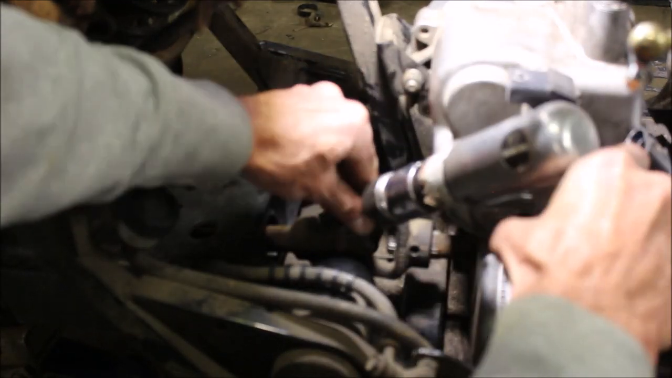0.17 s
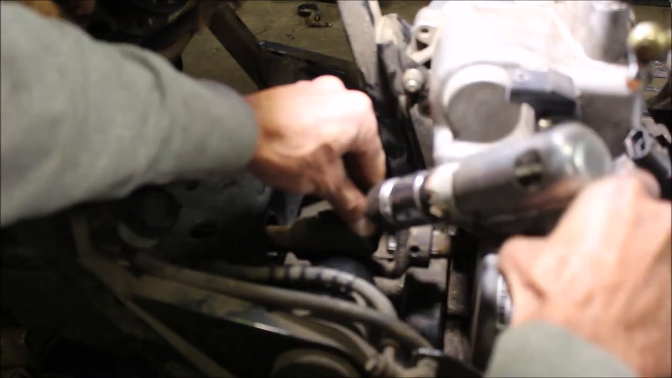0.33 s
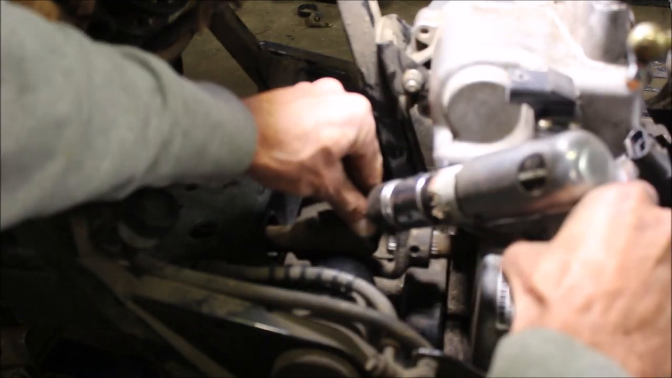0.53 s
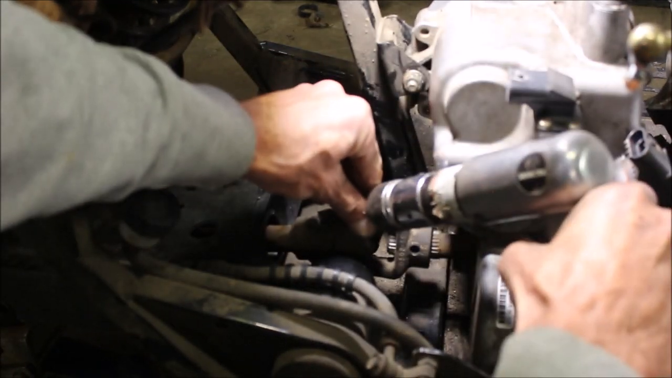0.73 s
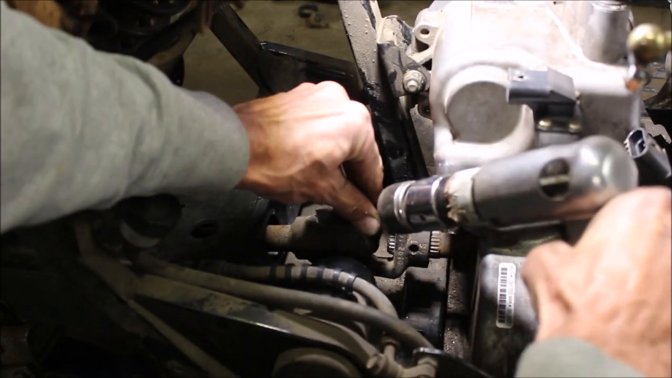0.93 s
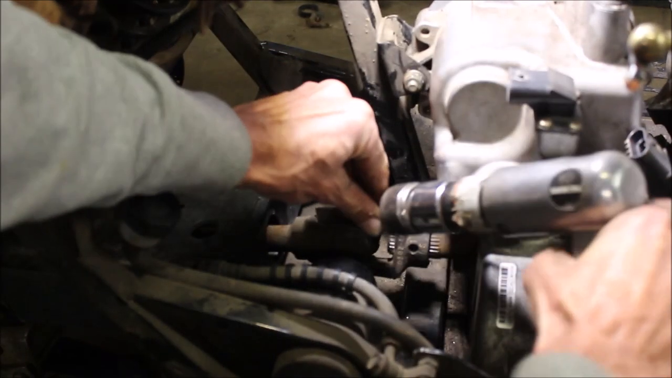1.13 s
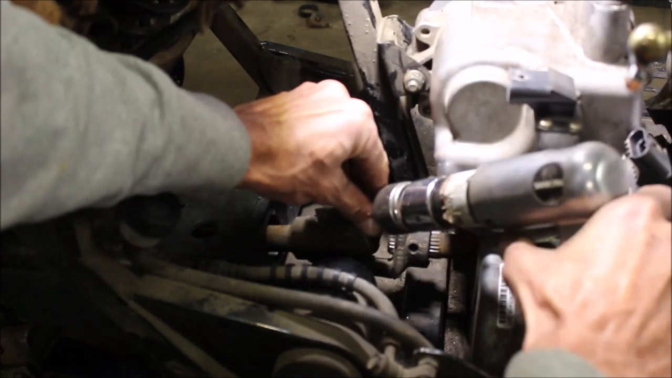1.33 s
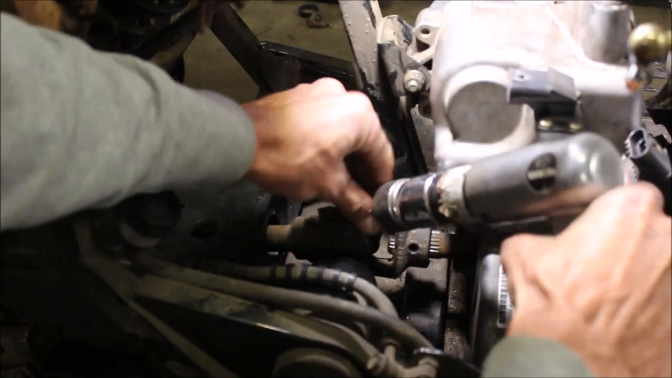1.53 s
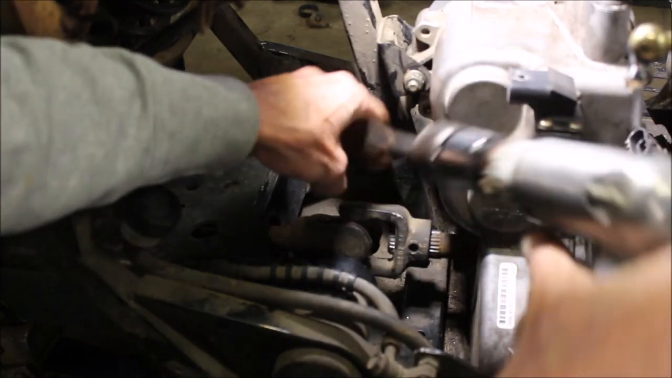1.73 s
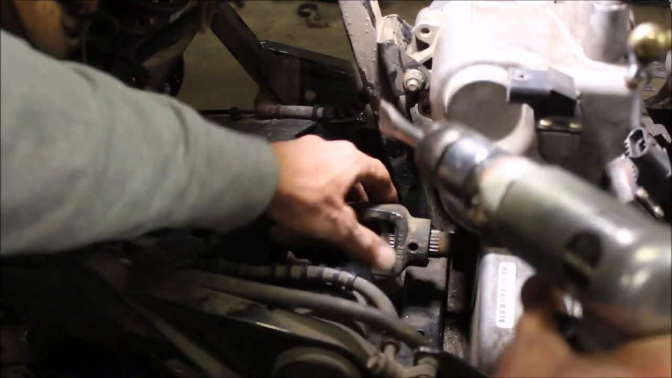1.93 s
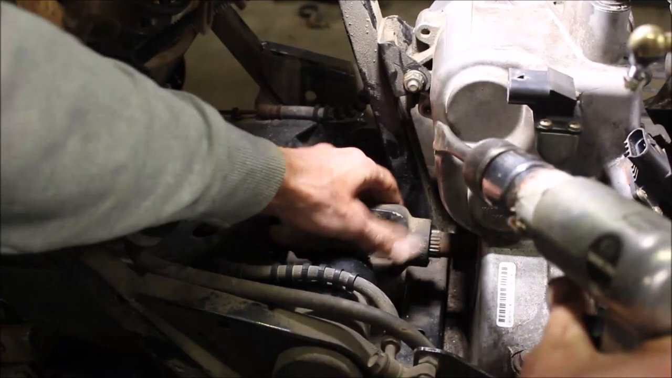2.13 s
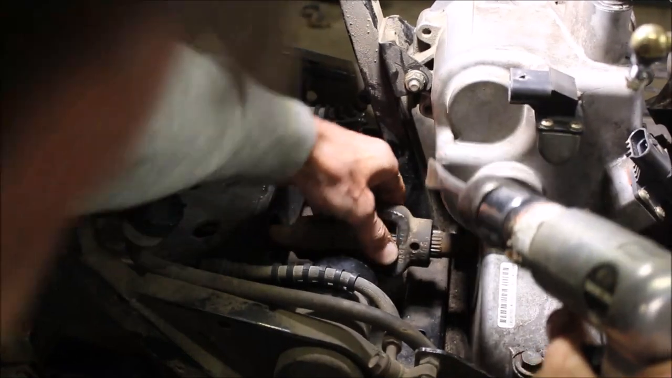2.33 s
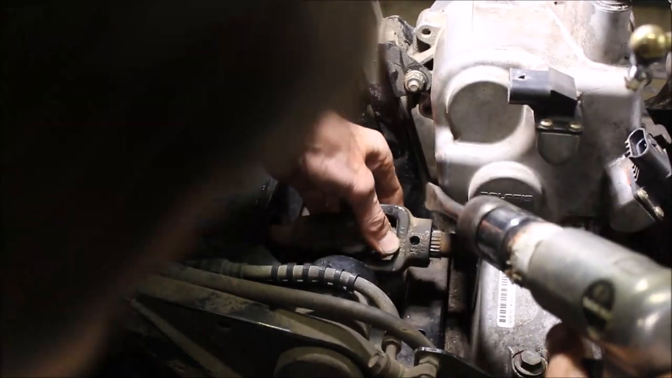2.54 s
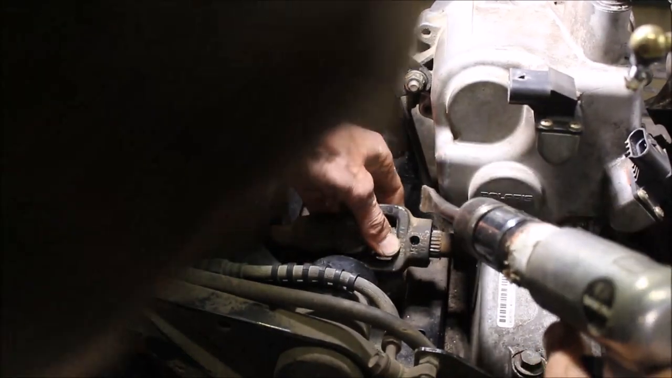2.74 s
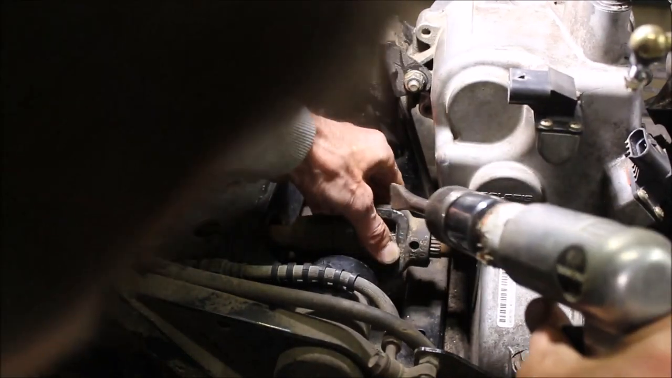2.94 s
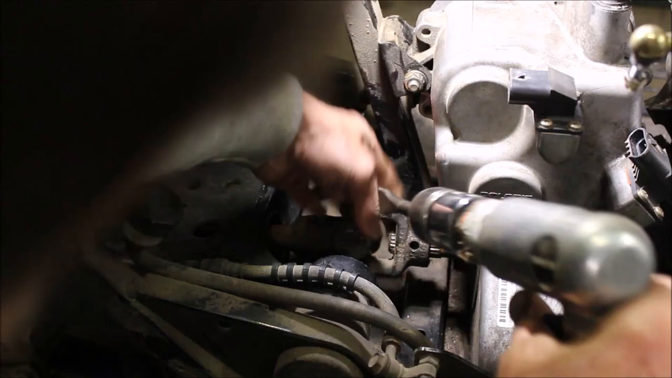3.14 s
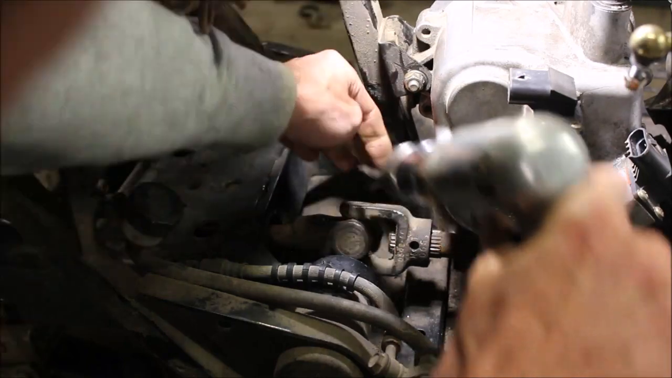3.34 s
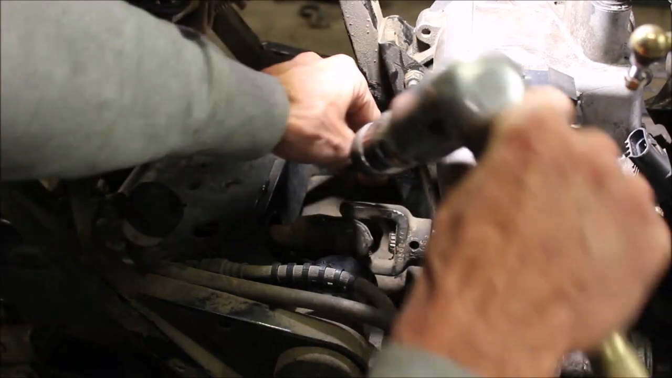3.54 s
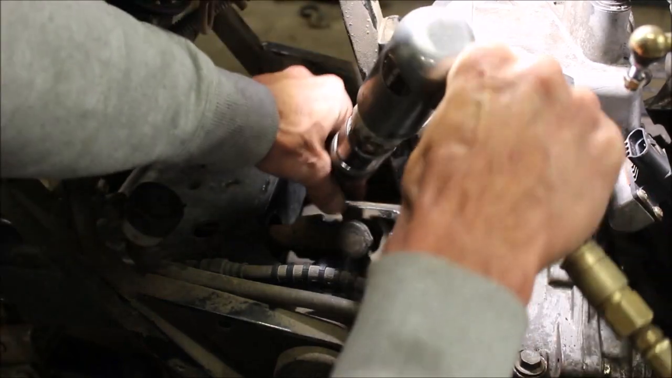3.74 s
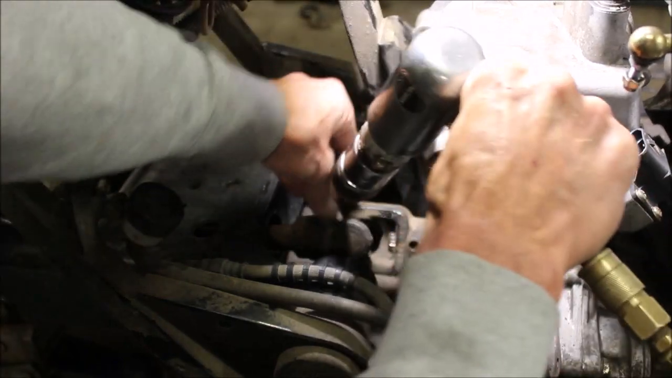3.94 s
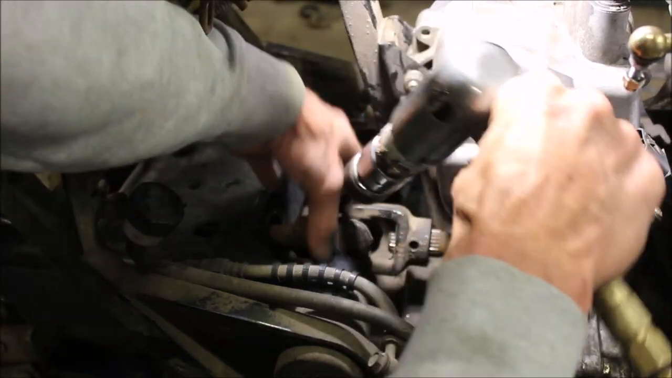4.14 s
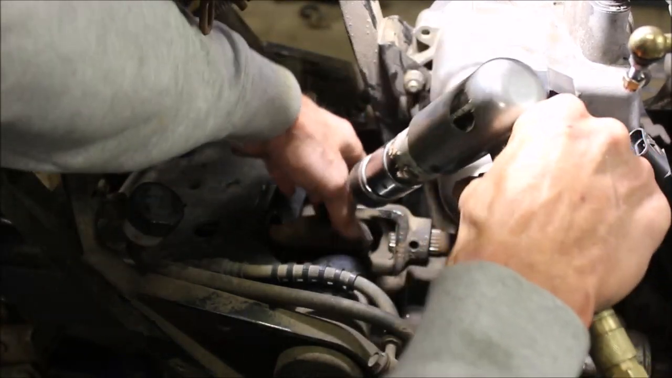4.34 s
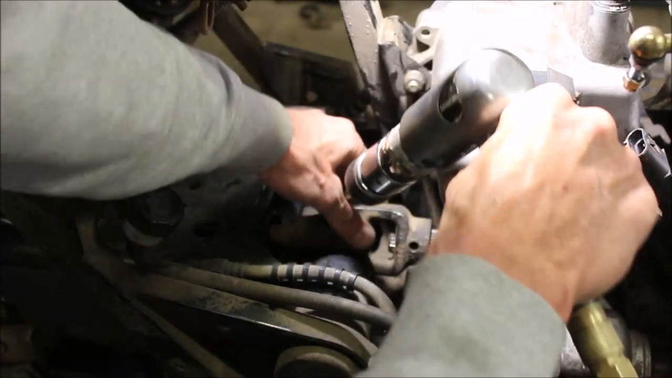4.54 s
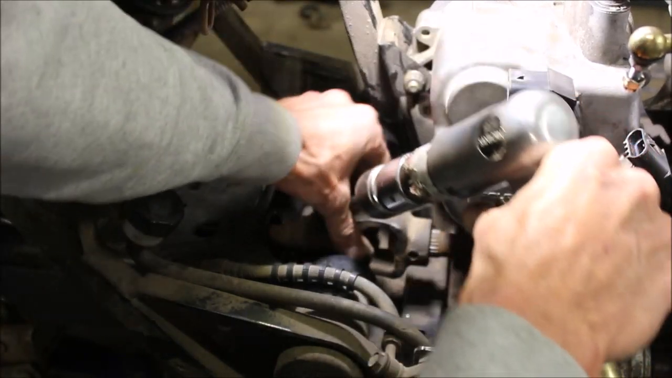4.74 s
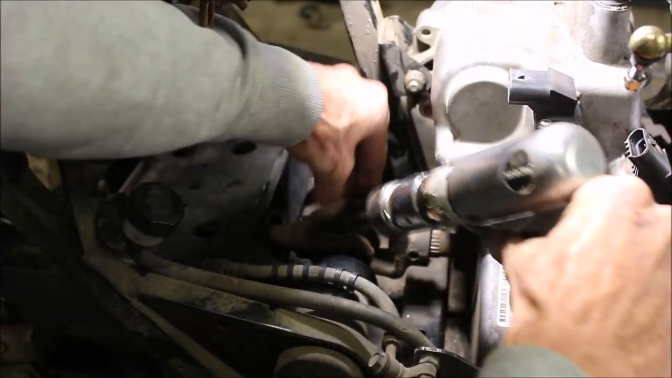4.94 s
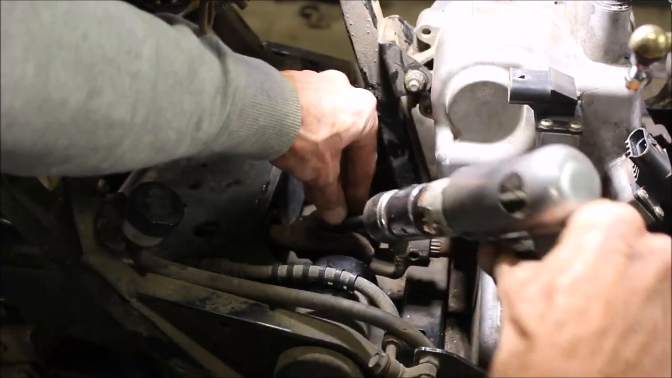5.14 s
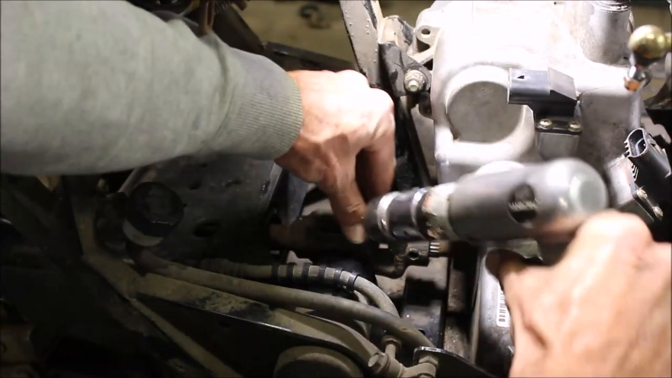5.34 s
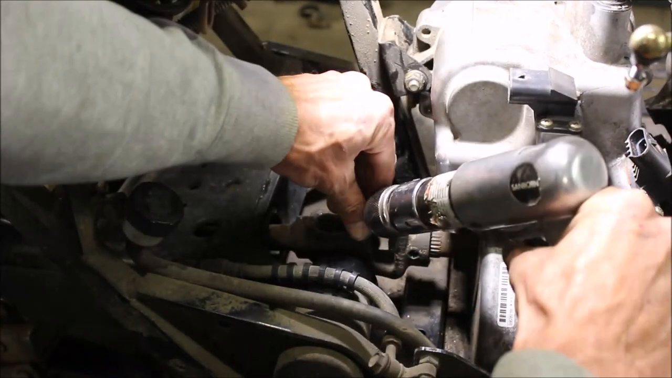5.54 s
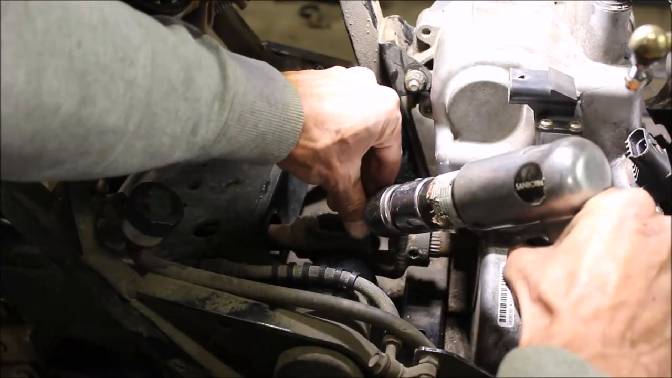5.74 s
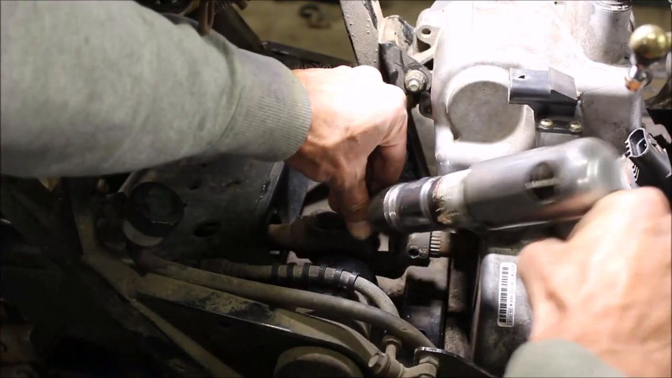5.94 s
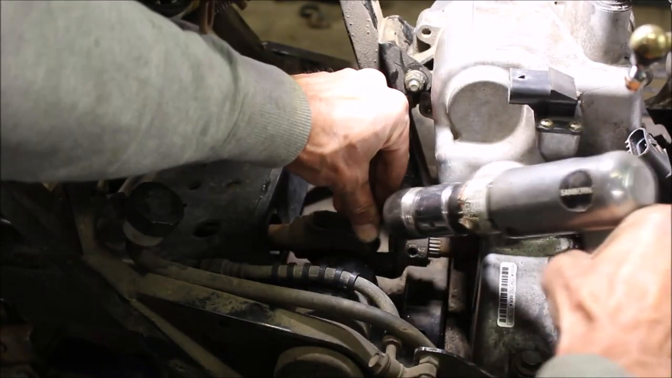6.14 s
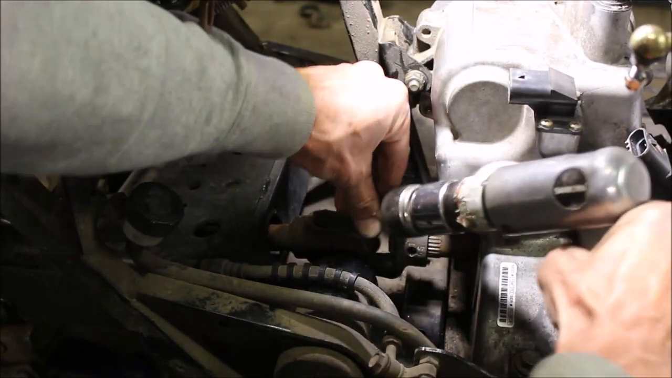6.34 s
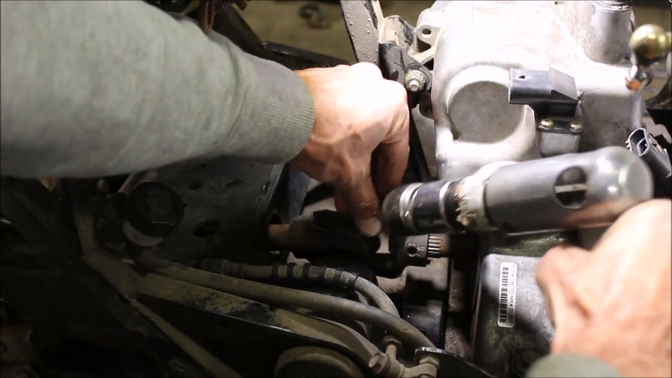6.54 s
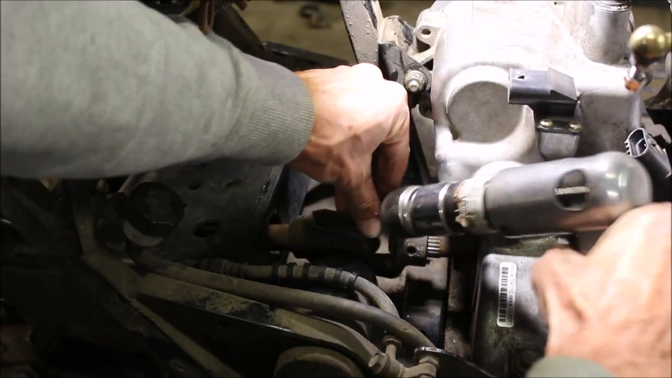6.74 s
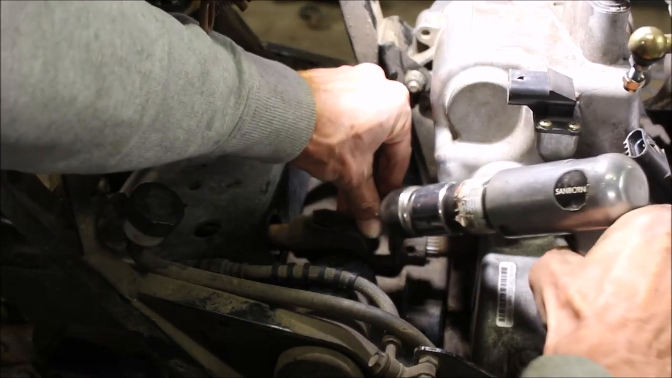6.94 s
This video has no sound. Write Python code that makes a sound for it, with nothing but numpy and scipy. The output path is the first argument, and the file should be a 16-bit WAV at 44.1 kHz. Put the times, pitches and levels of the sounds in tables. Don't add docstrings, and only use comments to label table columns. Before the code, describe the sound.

An air hammer fires a short rattling burst against a steel shaft, then metal knocks, scrapes and thuds, and a longer burst runs to the end.

```python
import sys
import numpy as np
from scipy import signal
from scipy.fft import rfft, irfft, next_fast_len
from scipy.io import wavfile
from scipy.ndimage import uniform_filter1d, map_coordinates

SR = 44100
rng = np.random.default_rng(int(sys.argv[2]) if len(sys.argv) > 2 else 0)


def natural_amplitude(level_db):
    exponent = np.asarray(level_db, float) / 20
    return 10 ** exponent


def put_to_file(sound):
    columns = np.atleast_2d(sound).T
    safe = np.clip(columns, -1, 1)
    whole_steps = np.round(safe * 32767)
    wavfile.write(sys.argv[1], SR, whole_steps.astype(np.int16))


N = 308259


def unit(x):
    return x / np.sqrt(np.mean(x ** 2) + 1e-20)


def peak(x):
    return x / np.max(np.abs(x))


def along(points, hz):
    f, v = np.transpose(points)
    return np.interp(np.log(hz + 1), np.log(f + 1), v)


def curve(rows):
    s, db = np.transpose(rows)
    return np.interp(np.arange(N) / SR, s, db, -120, -120)


def wobble(rate):
    knots = rng.standard_normal(int(N * rate / SR) + 4)
    return map_coordinates(knots, [np.arange(N) * rate / SR])


def filtered(x, response):
    length = x.shape[-1]
    m = next_fast_len(length + min(length, 2 * SR))
    return irfft(rfft(x, m) * response(np.fft.rfftfreq(m, 1 / SR)), m)[..., :length]


def modes(table, scatter_db=0):
    gains = []
    for k, (_, _, db) in enumerate(table):
        gains.append(natural_amplitude(db + scatter_db * rng.standard_normal()) * (-1) ** k)
    return lambda f: sum(g * 1j * f * w / (c * c - f * f + 1j * f * w) for g, (c, w, _) in zip(gains, table))


def noise(spectrum):
    return unit(filtered(rng.standard_normal(N), lambda f: natural_amplitude(along(spectrum, f))))


def ring(t, table):
    total = 0
    for hz, db, t60 in table:
        change, phase = rng.random(2)
        total = total + natural_amplitude(db + 0.79 * change - 60 * t / t60) * np.sin(2 * np.pi * (hz * t + phase))
    return total


def add(track, s, sound):
    part = track[round(s * SR):][:len(sound)]
    part += sound[:len(part)]


# f/Hz, t60/s
ECHO_TIME = [(150, 0.76), (600, 0.98), (2000, 0.74), (3500, 0.12), (4900, 0.64), (6500, 0.28),
             (10000, 0.36), (15000, 0.21)]


def room(x, scale):
    hz, t, z = signal.stft(rng.standard_normal((2, SR)), SR, nperseg=256)
    decay = natural_amplitude(-60 * t / (scale * along(ECHO_TIME, hz)[:, None]))
    tail = signal.istft(z * decay, SR, nperseg=256)[1]
    late = np.pad(x, (120, 0))[None]
    return signal.fftconvolve(late, tail / np.linalg.norm(tail[0]), axes=1)[:, :N]


# f/Hz, level/dB
SHOP_COLOUR = [(15, -44), (25, 3), (87, 5.5), (404, -5), (475, -12), (656, -13), (1070, -15), (1190, -13.5),
               (1440, -17.5), (2900, -19), (9250, -27), (15900, -35.5)]
# f/Hz, level/dB
FAN_TONES = [(86, -59.5), (479.5, -62), (1443, -67.5)]


def shop():
    t = np.arange(N) / SR
    fan = 0
    for hz, db in FAN_TONES:
        fan = fan + natural_amplitude(db - 2 + 3.5 * wobble(2.26)) * np.sin(2 * np.pi * hz * t + .5 * wobble(9.4))
    return natural_amplitude(-52.5) * np.array([noise(SHOP_COLOUR), noise(SHOP_COLOUR)]) + fan


# t/s, level/dB
SHUFFLE_LEVEL = [(0, -41), (.25, -53), (.4, -45.5), (.85, -59.5), (1.3, -39), (1.6, -47), (2.25, -49),
                 (2.5, -53.5), (2.75, -50), (3.15, -56), (3.8, -73), (4.45, -61), (4.7, -48.5), (5.55, -49),
                 (5.7, -76), (7, -61)]
# f/Hz, level/dB
SHUFFLE_COLOUR = [(35, -44), (60, -48), (81, 1.5), (124, -8), (253, -2), (547, -14), (900, -22.5),
                  (1170, -21), (1980, -120)]
# f/Hz, level/dB
SLEEVE_COLOUR = [(290, -30), (500, -13.5), (542, -15), (1290, -9.5), (1490, -9), (3670, -10), (12000, -30),
                 (15600, -64), (22000, -120)]
# middle t/s, half length/s, level/dB
ARM_REACHES = [
    (0, 0.057, -47.5),
    (0.37, .07, -60),
    (1.503, 0.82, -59),
    (2.378, 0.28, -51.5),
    (3.29, .06, -52),
    (3.518, 0.39, -58.5),
    (4.3, 0.46, -58),
    (5.12, 0.18, -51.5),
]


def hands():
    t = np.arange(N) / SR
    rustle = natural_amplitude(-68.5)
    for s, half, db in ARM_REACHES:
        rustle = rustle + natural_amplitude(db) * np.exp(-((t - s) / half) ** 2)
    shuffle = unit(natural_amplitude(2.5 * wobble(25)) * noise(SHUFFLE_COLOUR))
    cloth = unit(natural_amplitude(1.5 * wobble(40)) * noise(SLEEVE_COLOUR))
    return natural_amplitude(curve(SHUFFLE_LEVEL)) * shuffle + rustle * cloth


# f/Hz, level/dB, t60/s
FADING_RING = [(2070, -60, 1), (3000, -58, 1), (3950, -57, .5), (4200, -67, .5), (5300, -62, 1)]
# t/s, level/dB, f/Hz, length/s, sharpness
SLIP_WHINES = [(0.31, -58, 5370, 0.14, 12), (0.35, -57, 4200, 0.09, 8), (1.79, -52, 4000, .04, 30),
               (2.165, -44, 3600, 0.04, 40), (1.84, -53, 262, .5, 60), (1.4, -58, 480, .9, 120),
               (0, -56, 480, .6, 120), (1.4, -57, 942, .3, 120), (1.3, -62, 5460, .3, 40),
               (1.3, -62, 7456, .28, 80), (1.3, -64, 9000, .2, 60)]
# f/Hz, level/dB, t60/s
BRACKET_RING = [(703, -4, 0.11), (1298, -7, 0.19), (1615, -16, 0.19), (2060, -10, 0.089), (2950, -9, 0.13),
                (3950, -9, 0.091)]
# t/s, level/dB
BRACKET_BUMPS = [
    (5.297, -24.5),
    (4.043, -45),
    (1.6, -53),
]


def slips():
    out = ring(np.arange(N) / SR, FADING_RING) * natural_amplitude(2 * wobble(40))
    t = np.arange(SR) / SR
    for s, db in BRACKET_BUMPS:
        onset = 1 - np.exp(-t / 0.0013)
        add(out, s, natural_amplitude(db) * onset * ring(t, BRACKET_RING) * natural_amplitude(3 * wobble(120)[:len(t)]))
    for s, db, hz, length, sharpness in SLIP_WHINES:
        touch = np.sin(np.pi * np.clip(t / length, 0, 1)) ** .5
        whine = unit(filtered(rng.standard_normal(len(t)), modes([(hz, hz / sharpness, 0)])))
        add(out, s, natural_amplitude(db) * touch * whine)
    return out


# t/s, level/dB, f/Hz
BAY_THUDS = [(0.001, -43, 185), (1.842, -37.5, 100), (2.457, -36.5, 167), (2.54, -31.5, 387),
             (2.967, -34, 352), (3.619, -53, 175), (3.898, -38.5, 204), (3.95, -23, 184.3),
             (4.099, -28, 194.7), (4.155, -41, 184), (4.569, -36, 223), (4.74, -30, 346), (4.923, -47, 204),
             (5.026, -22, 188), (5.127, -27, 174), (5.314, -29.5, 287), (5.397, -28, 112),
             (5.437, -24.5, 210), (5.497, -42, 186)]


def thuds():
    out, t = np.zeros(N), np.arange(16384) / SR
    for s, db, hz in BAY_THUDS:
        push = rng.standard_normal(len(t)) * (1 - np.exp(-t / 0.0022)) * natural_amplitude(-60 * t / 0.37)
        panel = modes([(hz, hz / 2.84, 0), (hz * 2, hz / 28, -8)])
        add(out, s, natural_amplitude(db - 0.5) * peak(filtered(push, lambda f: panel(f) * 700 / (700 + 1j * f))))
    return out


# f/Hz, width/Hz, level/dB
YOKE_MODES = [(1300, 185, 0.5), (2110, 210, -2), (2930, 150, 2), (3610, 260, -5.5), (4570, 98, -5)]
# t/s, level/dB, f/Hz, bass level/dB
YOKE_NUDGES = [(0.606, -34, 1240, -7), (0.69, -32.5, 1250, -19), (0.7801, -31, 1180, -18),
               (1.905, -35, 1300, -20), (1.946, -34, 1300, -22), (1.9897, -30.5, 1220, -29),
               (2.029, -32.5, 2000, -22), (2.0772, -31.5, 1280, -18), (2.122, -33, 1270, -23),
               (3.1094, -58, 852, 18), (3.699, -33, 1290, -7.5), (3.742, -34, 1310, -6),
               (3.826, -33, 1240, -9), (4.5595, -37.5, 1260, 3), (4.9088, -29.5, 1170, -23),
               (5.248, -33, 1950, -49), (5.3024, -33.5, 1300, 13.5)]
# t/s, level/dB, f/Hz, treble level/dB, bass level/dB
SHORT_SCRAPES = [(0.5232, -25, 2310, -21, -16), (1.86, -29, 3300, -4.5, -22), (2.2034, -20, 5340, -1, -37),
                 (2.3844, -30.5, 1870, -25, -27), (2.4438, -21, 2740, -46, -11.5),
                 (2.5333, -44, 960, -36, 15.5), (2.9607, -51, 1080, -38, 23),
                 (3.2929, -28.5, 4750, -1, -16), (3.899, -26.5, 2730, -4, -6), (3.9514, -34, 940, -8, 9.5),
                 (4.1116, -21.5, 4260, -55, -17), (4.8196, -25.5, 1230, -7, -13),
                 (4.986, -17, 4800, -7.5, -11), (5.1364, -26, 1540, -19, -1)]
# t/s, level/dB, f/Hz, treble level/dB, bass level/dB
LONG_GRINDS = [
    (2.317, -22, 1900, -48, -21),
    (4.0233, -21.5, 1350, -53, -14.5),
    (4.7361, -35, 2570, -65, 4),
    (5.0247, -15.5, 5460, -6, -7.5),
    (5.3608, -22, 3260, -47, -9),
    (5.436, -22, 1170, -19, -6),
]


def drags():
    out, t = np.zeros(N), np.arange(6144) / SR
    contacts = [(s, db, hz, -30, bass_db, 0.027) for s, db, hz, bass_db in YOKE_NUDGES]
    contacts += [(*row, 0.038) for row in SHORT_SCRAPES]
    contacts += [(*row, 0.059) for row in LONG_GRINDS]
    for s, db, hz, treble_db, bass_db, length in contacts:
        lumps = uniform_filter1d(rng.standard_normal(len(t)), size=150)
        grit = rng.standard_normal(len(t)) * natural_amplitude(2.5 * unit(lumps))
        catch = np.clip((db + max(bass_db, 0) + 36) / 10, 0, 1)
        rise = catch * (1 - np.exp(-t / 0.00053)) + (1 - catch) * (1 - np.exp(-(t / 0.0025) ** 2))
        stroke = rise * (np.exp(-(t / length) ** 3) + 0.76 * catch * natural_amplitude(-60 * t / 0.02))
        yoke, own = modes(YOKE_MODES, 1.6), modes([(hz, hz / 20, 2), (2800, 3500, -9)])
        bright, casting = modes([(7600, 3800, 0)]), modes([(508, 57, 0), (920, 305, 0.0068)])
        parts = []
        for response in (lambda f: yoke(f) + own(f), bright, casting):
            part = filtered(grit, response)
            parts.append(part * np.linalg.norm(stroke) / np.linalg.norm(part * stroke))
        body, treble, bass = parts
        mix = body + natural_amplitude(treble_db + 2.5 - 60 * t / 0.66) * treble + natural_amplitude(bass_db) * bass
        add(out, s, natural_amplitude(db - 12.5) * stroke * mix)
    return out


# t/s, level/dB, ring f/Hz, tip f/Hz, chisel ring level/dB
STEEL_KNOCKS = [(0.664, -17.5, 796, 7160, -43), (1.631, -28.5, 1620, 4950, -14),
                (1.823, -8, 820, 7560, -35), (1.834, -17, 885, 7450, -24), (2.204, -15.5, 5000, 9400, -7),
                (2.375, -26, 1340, 8360, -14), (2.632, -28.5, 1370, 8500, -18.5),
                (2.848, -36.5, 1463, 6810, -37), (3.278, -31, 4860, 7200, -14),
                (3.899, -19, 3000, 8500, -18.5), (3.94, -26.5, 1010, 9400, -10),
                (4.372, -41.5, 2670, 7240, -2.5), (4.539, -32.5, 1230, 7320, -33),
                (4.596, -20, 2253, 4940, -22), (4.981, -16.5, 4700, 7800, -31),
                (4.992, -8.5, 2357, 7250, -17), (5.015, -4, 4000, 7200, -20.5),
                (5.132, -20.5, 1340, 7800, -21.5), (5.294, -22.5, 1300, 6630, -25),
                (5.435, -32, 5060, 9500, -13), (5.598, -40, 1250, 8200, -22)]


def knocks():
    out, t = np.zeros(N), np.arange(6144) / SR
    attack = 1 - np.exp(-t / .001)
    for s, db, hz, tip_hz, tip_db in STEEL_KNOCKS:
        crack = rng.standard_normal(len(t)) * attack * natural_amplitude(-60 * t / 0.018)
        buzz = natural_amplitude(4 * unit(uniform_filter1d(rng.standard_normal(len(t)), size=100)))
        struck = modes([(hz * 1.2, hz, 2)] + YOKE_MODES, 2)
        soften = lambda f: (1j * f / (hz / 2 + 1j * f)) ** 2 / (1 + 1j * f / (hz + 1500))
        body = peak(filtered(crack, lambda f: struck(f) * soften(f)))
        part = ring(t, [(hz, -8, .05), (hz * 1.15, -11, .04), (hz * .62, -14, .05), (hz * 2.1, -14, .03)])
        bar = ring(t, [(4720, -4, .08), (5130, -9, .09), (4480, -10, .06)]) * natural_amplitude(-3)
        tip = ring(t, [(tip_hz, -7, .09), (tip_hz * .885, -10, .05), (tip_hz * 1.02, -10, .06)])
        tip = tip + peak(filtered(crack, modes([(8500, 2200, 0)])))
        rings = part + natural_amplitude(tip_db + 11.5) * bar + natural_amplitude(tip_db + 12.5) * tip
        add(out, s, natural_amplitude(db - 4.5) * (body + attack * buzz * rings))
    return out


# first blow t/s, let go t/s, chisel over shaft level/dB
TRIGGER_PULLS = [
    (0.841, 1.242, -20),
    (5.979, 7.201, 9),
]
# t/s from first blow, level/dB
VALVE_OPENS = [
    (-.044, -80),
    (-.024, -45.5),
    (-.002, -23.5),
    (.026, -24),
    (.19, -29.5),
]
# t/s from let go, level/dB
VALVE_CLOSES = [
    (0, -28.5),
    (.07, -40),
    (.19, -47),
    (.32, -76),
]
# f/Hz, width/Hz, level/dB
VALVE_MODES = [(1495, 540, 11.5), (3520, 810, 8.5), (6800, 2800, 3.5), (12000, 3000, -38)]


def air():
    level = 0
    for on, off, _ in TRIGGER_PULLS:
        rows = [(on + s, db) for s, db in VALVE_OPENS] + [(off + s, db) for s, db in VALVE_CLOSES]
        level = level + natural_amplitude(curve(rows))
    valve = modes(VALVE_MODES)
    hiss = filtered(rng.standard_normal(N), lambda f: valve(f) + natural_amplitude(-26) * f / (f + 900))
    return level * natural_amplitude(1.5 * wobble(60)) * unit(hiss)


POP_DB, CLANG_DB, LAG_MS, CHISEL_DB = -5, -14.5, 2.9, -5.5
# t/s, pop level/dB, clang level/dB, chisel over shaft level/dB
FIRST_BURST = [(0.858, 10, 6.5, 1.5), (0.8827, 8, 6.5, -14), (0.9059, 1.5, 1, -20), (0.9303, 3.0, 0.5, -18),
               (0.9551, 1, -3, 1), (0.9792, 1.9, 1.9, 6), (0.9999, -7, 1, 1), (1.0204, -0.9, -2.5, 8),
               (1.0414, -3.5, -0.5, 4), (1.0625, 1, -3.2, 0), (1.0865, 0, -0.5, 0), (1.1121, 0.5, -2.5, 10),
               (1.1355, 0, -0.5, -6), (1.1611, -1, -2.5, 5), (1.1828, 0.8, -0.5, 10),
               (1.2035, -1.3, -0.5, -3), (1.2247, -1, -3, -2), (1.246, -1, -1, 12), (1.2725, -11, -6, 3)]
SECOND_BURST = [(5.9965, 11, 7.5, -12.5), (6.0208, 8, 6, -15), (6.0442, 2, 2.5, -9), (6.0672, 2, 4.5, 9.5),
                (6.0922, 0, 2, 4), (6.1165, 3.5, -1.5, 7), (6.1412, 1, -1.5, -1.5), (6.167, 1.5, 0.7, 7),
                (6.1895, 0, 0.5, 12), (6.2118, 0.5, 0.8, 9), (6.233, 2.3, -0.5, 12.5),
                (6.2554, 0.5, -3.5, 1.5), (6.2821, 0.4, 0.4, 3.7), (6.3043, 1.5, 0, 6),
                (6.3262, 0.5, -4, 9.4), (6.3513, 0.5, 0, 7.4), (6.3733, 1, -2.5, -11),
                (6.399, -2, -1.3, 0.2), (6.4248, -1.5, 1, 8), (6.4468, 0, -0.5, 9.5), (6.4689, -1, 0.7, 2),
                (6.4916, -2, -2, 10), (6.5155, -1.5, -0.4, 8.0), (6.5422, -0.5, 1, 6.8),
                (6.5658, -2.5, 1.5, 1.5), (6.5899, 0.3, 1.5, 11), (6.6118, 0.6, -1, 5),
                (6.6343, -2, 1.5, 12), (6.6555, -0.1, 1.5, 13), (6.6774, 0.3, -1.8, 17), (6.699, -1, -1, 7),
                (6.723, 0, -1, 11), (6.7454, -0.0, 0.5, 7), (6.7679, 0.8, -0.5, 12),
                (6.7908, -1.5, -4.2, -4), (6.8167, 0.3, 1.5, 13), (6.8403, -0.1, 1, 5),
                (6.8632, -0.8, 2.5, 12), (6.8854, -1.5, -1, 9.3), (6.9081, 0, 0, 9),
                (6.9317, -0.5, 0.5, 9.1), (6.9549, 0, -1.5, 3), (6.9824, 2.5, 1.7, 9)]


def strokes():
    # a strong clang, then a weak pop about 4 ms later
    rows = [(s + .004, -14, -4.5, -3, chisel_db) for s, _, chisel_db in TRIGGER_PULLS]
    for s, pop_db, clang_db, chisel_db in [*FIRST_BURST, *SECOND_BURST]:
        pop_db, clang_db = POP_DB + pop_db, CLANG_DB + clang_db
        pulled = max(on for on, _, _ in TRIGGER_PULLS if on < s)
        surge = np.exp(-(s - pulled) / 0.0287)
        lag_ms = LAG_MS - 2.8 * surge + .25 * rng.standard_normal()
        rows.append((s, pop_db, clang_db, lag_ms, CHISEL_DB + chisel_db))
        if surge > .02:
            rows.append((s + .0125, pop_db - 13.5, clang_db - 19.5 + 23 * surge, 1, 0))
    return rows


def exhaust_pop(t, pop_db):
    u = t / natural_amplitude(0.21 * max(pop_db - POP_DB, 0))
    opening = (1 - np.exp(-t / .00008)) * np.exp(-(u / .0013) ** 2)
    puff = -np.sin(2 * np.pi * 700 * u + 0.049) * opening
    port_ring = -natural_amplitude(-8) * np.sin(2 * np.pi * 2600 * t) * natural_amplitude(-60 * t / 0.005)
    return natural_amplitude(pop_db - 4.5) * (puff + port_ring)


# f/Hz, width/Hz, level/dB
SHAFT_MODES = [(1720, 150, -4), (2250, 250, -6), (2900, 350, 0), (3470, 350, -4)]
# f/Hz, width/Hz, level/dB
CHISEL_MODES = [(4060, 310, 1), (5100, 600, -7), (5750, 350, -13), (7100, 600, -11)]
# f/Hz, width/Hz, level/dB
SHANK_MODES = [(9600, 800, -3), (11600, 600, 0), (13300, 700, -3)]
# f/Hz, level/dB per Hz
BLOW_SPLASH = [(300, -49), (900, -3), (1740, -10), (2200, -19), (4090, -2), (6000, 0.5), (11800, -9),
               (15900, -28.5)]


def piston_clang(t, clang_db, chisel_db):
    blow = (1 - np.exp(-t / 0.00051)) * natural_amplitude(-60 * t / 0.021)
    rattle = np.sign(rng.standard_normal(len(t))) * blow
    strike = natural_amplitude(-17) * rattle + (np.arange(len(t)) == 20)
    shaft, chisel, shank = modes(SHAFT_MODES, 1.5), modes(CHISEL_MODES, 1.5), modes(SHANK_MODES, 2)
    steel = lambda f: natural_amplitude(-chisel_db / 2) * shaft(f) + natural_amplitude(chisel_db / 2) * chisel(f) + natural_amplitude(-10) * shank(f)
    splash = filtered(rattle, lambda f: natural_amplitude(along(BLOW_SPLASH, f) - 21.5 - chisel_db / 2))
    clang = filtered(strike, steel) + splash
    return natural_amplitude(clang_db + 19.5) * clang / np.linalg.norm(clang)


# f/Hz, width/Hz, level/dB
BAY_AIR = [(247, 59, 13.5), (293, 46, 9.5), (408, 21, 7.5), (552, 87, -2.5), (713, 66, -6), (926, 46, 0)]
# f/Hz, level/dB, t60/s
FRAME_RING = [(942, 11.5, 0.44), (1387, 2.5, 0.39), (1790, 4.5, 0.33), (2170, -14, 0.31), (2385, -24, 1.3),
              (2810, -26, 5.0), (4000, -10, 1.1), (4630, -26, 0.39), (5130, -9, 0.62), (5700, 3, 0.71),
              (6460, -26, 0.39), (7456, -37, 1.6)]


def hammer():
    pops, clangs, t = np.zeros(N), np.zeros(N), np.arange(1024) / SR
    for s, pop_db, clang_db, lag_ms, chisel_db in strokes():
        add(pops, s - .0003, exhaust_pop(t, pop_db))
        add(clangs, s + (lag_ms - 1.1) / 1000, piston_clang(t, clang_db, chisel_db))
    bay = modes(BAY_AIR)
    echo = lambda f: 1 + natural_amplitude(-8) * bay(f) * np.exp(-2j * np.pi * f * 0.0017)
    pops = filtered(pops, lambda f: echo(f) * (1j * f / (70 + 1j * f)) ** 3)
    frame = modes([(hz, 1.8 / t60, db) for hz, db, t60 in FRAME_RING])
    beating = natural_amplitude(2.5 * wobble(70))
    ringing = beating * filtered(clangs + 0.24 * pops, frame)
    ringing = filtered(ringing, lambda f: 1j * f / (300 + 1j * f))
    panels = room(filtered(clangs, modes([(4800, 1700, 0)])), scale=1.86)[0]
    return pops + clangs + natural_amplitude(4.5) * ringing + natural_amplitude(-9) * panels


# t/s, level/dB
DEEP_THUMPS = [
    (.858, -24),
    (1.826, -31),
    (5.996, -20),
]


def deep_thumps():
    out, t = np.zeros(N), np.arange(8192) / SR
    for s, db in DEEP_THUMPS:
        add(out, s, natural_amplitude(db - 60 * t / 0.11) * np.sin(2 * np.pi * 40 * t))
    return out


# t/s, level/dB, f/Hz
HARD_TICKS = [(1.658, -46, 8500), (1.69, -41, 4500), (1.892, -36, 3200), (2.2215, -22, 7700),
              (2.317, -36, 2100), (2.3764, -22, 5160), (2.379, -27, 8400), (2.4437, -31, 9000),
              (2.532, -46, 6000), (2.632, -39, 8500), (3.89, -39, 3500), (3.8992, -18, 5000),
              (3.9437, -23, 4960), (4.0426, -23, 2080), (4.0963, -33, 3000), (4.1107, -32, 6500),
              (4.128, -30, 3900), (4.5959, -29, 2470), (4.7378, -24.5, 1880), (4.846, -34, 1390),
              (4.911, -32, 4800), (4.925, -41, 7000), (4.975, -32, 4700), (4.9914, -10.5, 2210),
              (5.0153, -7.5, 4000), (5.1323, -25.5, 5500), (5.2631, -38, 4500), (5.3624, -23.5, 4240),
              (5.4362, -29, 5500)]


def ticks():
    out, t = np.zeros(N), np.arange(1024) / SR
    for s, db, hz in HARD_TICKS:
        snap = rng.standard_normal(len(t)) * (1 - np.exp(-t / .0004)) * natural_amplitude(-60 * t / 0.0094)
        add(out, s, natural_amplitude(db) * peak(filtered(snap, modes([(hz, hz / 4, 0), (hz, hz, -12)]))))
    return out


# f/Hz, level/dB
NEAR_WIDTH = [(60, -27), (150, -16.5), (380, -19), (950, -10.5), (2380, -3.5), (5980, -1), (15000, 4)]
# f/Hz, level/dB
SHOP_WIDTH = [(60, -10.5), (240, -5.5), (950, 4), (3770, 3.5), (15000, 1)]


def scene():
    far_mid, far_side = shop()
    contacts = filtered(drags() + knocks() + ticks(), lambda f: 1 / (1 + 1j * f / 9000) ** 2)
    close = hands() + slips() + thuds() + contacts
    loud = air() + hammer()
    near = loud + close + deep_thumps()
    z = signal.stft(near, nperseg=128)[2]
    scatter = np.exp(2j * np.pi * rng.random(z.shape))
    spread = signal.istft(z * scatter, nperseg=128)[1][:N]
    space = room(natural_amplitude(-11) * loud + natural_amplitude(-19.5) * close, scale=1)
    space = space + natural_amplitude(-10.5) * room(close + loud / 2, scale=0.22)
    mid, side = np.array([near, natural_amplitude(-2.5) * spread]) + space
    side = filtered(side, lambda f: natural_amplitude(along(NEAR_WIDTH, f)))
    side = side + filtered(far_side, lambda f: natural_amplitude(along(SHOP_WIDTH, f)))
    return np.array([mid + far_mid + side, mid + far_mid - side])


def band_limit(x):
    return signal.sosfilt(signal.butter(12, 16030, fs=SR, output="sos"), x)


def record(dry):
    x = filtered(dry, lambda f: (1j * f / (70 + 1j * f)) ** 2)
    x = x / (1 + np.abs(x) ** 6) ** (1 / 6)
    return band_limit(x)


dry = scene()
out = record(dry)
put_to_file(out)
```